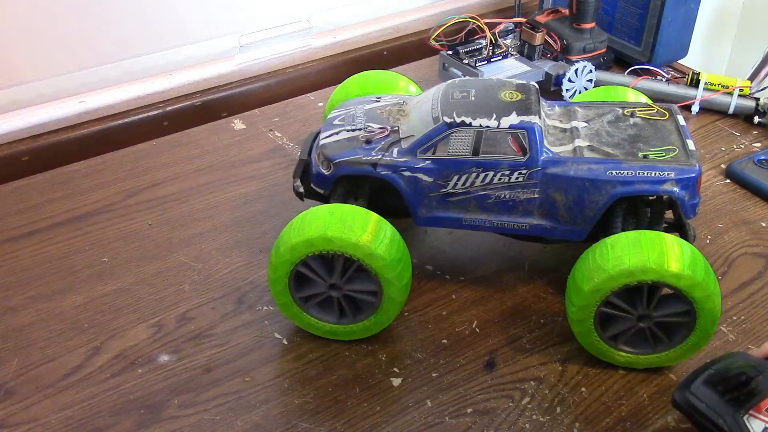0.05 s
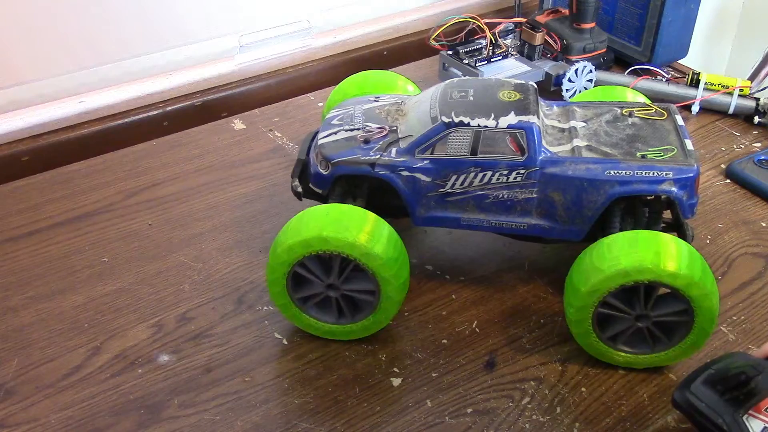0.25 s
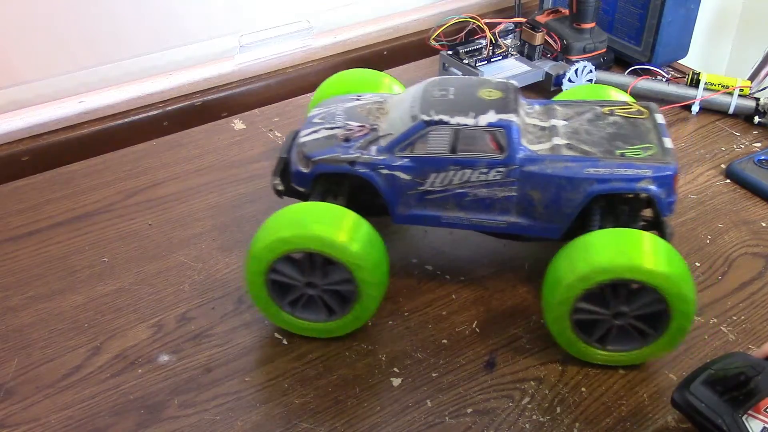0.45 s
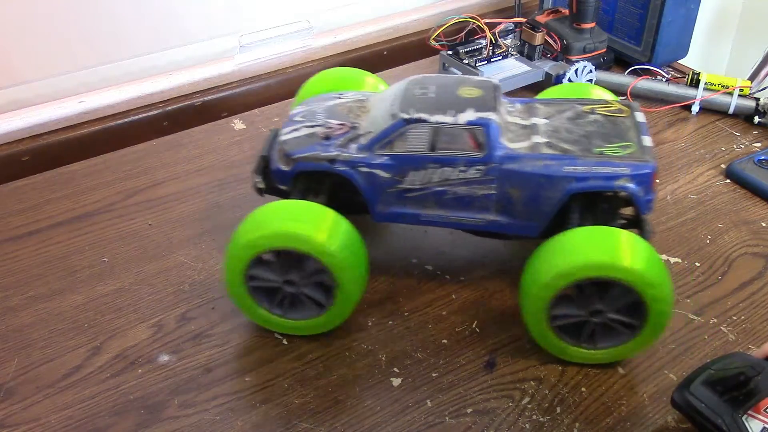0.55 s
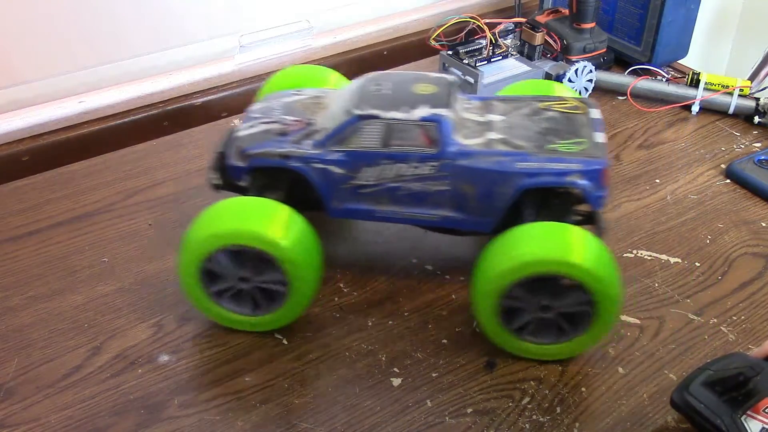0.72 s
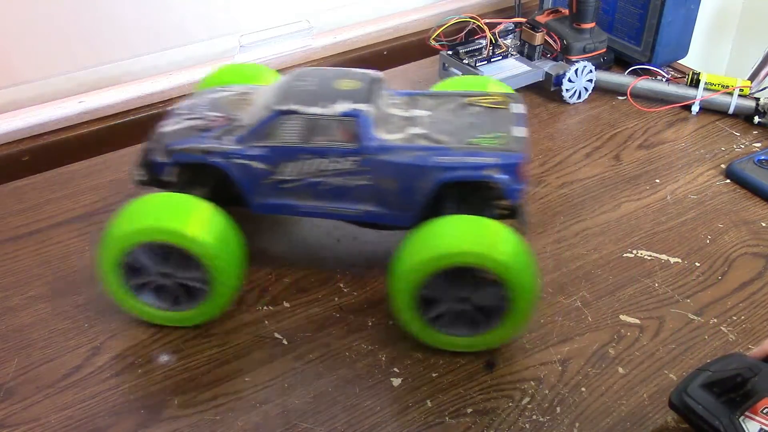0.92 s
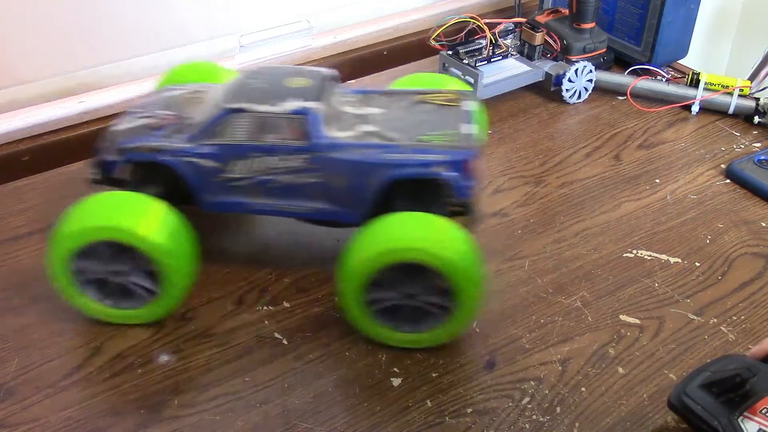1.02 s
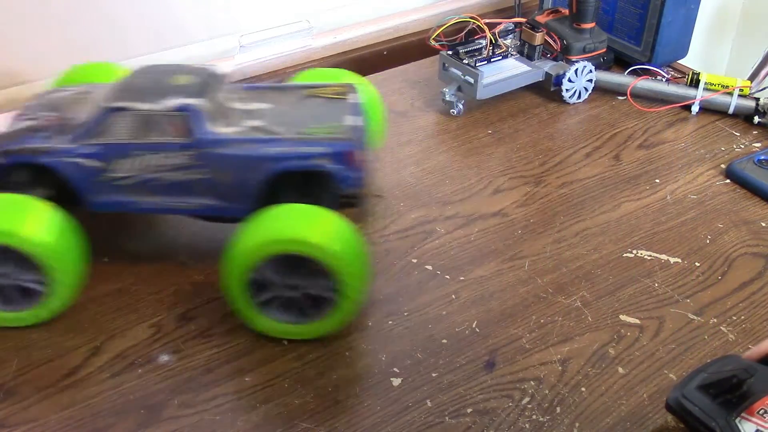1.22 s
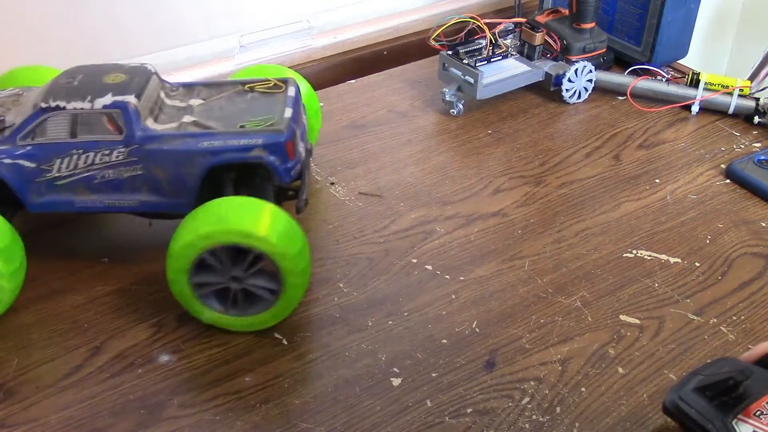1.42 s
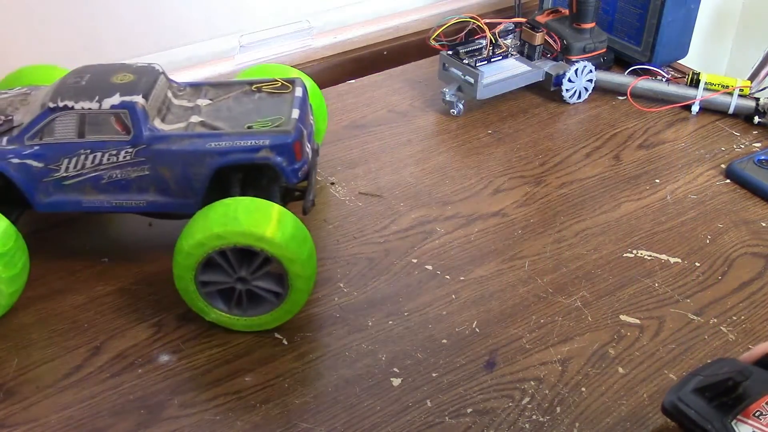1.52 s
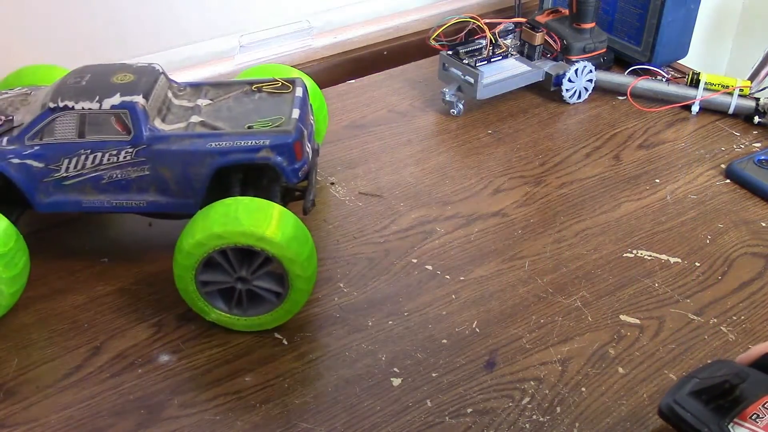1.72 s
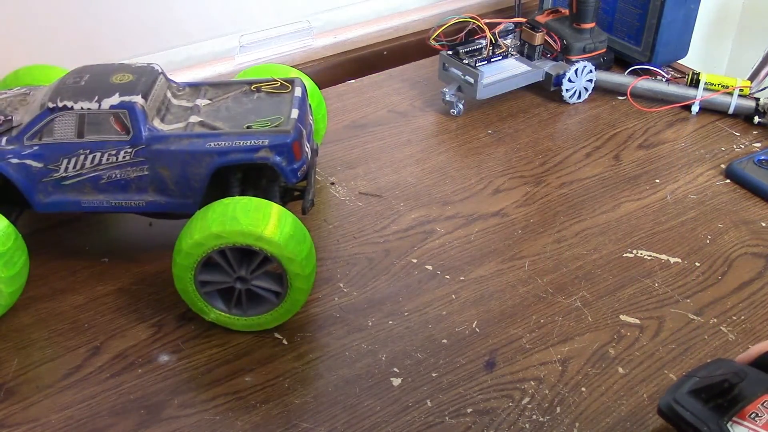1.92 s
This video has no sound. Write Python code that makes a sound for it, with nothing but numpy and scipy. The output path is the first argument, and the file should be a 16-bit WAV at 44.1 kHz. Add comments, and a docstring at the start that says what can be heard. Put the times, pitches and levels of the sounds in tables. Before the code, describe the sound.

A toy electric truck whines and rattles across a wooden table, then thumps to a stop.

```python
"""A toy electric truck on a wooden table in a small, quiet room, close to the microphone.
It creaks and pulls away at 0.2 s: plastic gears rattle and clack, and the chopped motor current
whines at a fixed pitch, fluttering as the rotor turns. The tyres set the table top booming.
Near 1.2 s the throttle is let go, the motor can pings and the gearbox clatters under braking.
From 1.5 s the body rocks to rest, with thumps that ring the table and a few last creaks."""
import sys
import numpy as np
from scipy import signal
from scipy.fft import rfft, irfft, next_fast_len
from scipy.io import wavfile
from scipy.ndimage import map_coordinates

SR = 44100
rng = np.random.default_rng(int(sys.argv[2]) if len(sys.argv) > 2 else 0)


def master_out(mix):
    """Clip the mix to full scale and print it as 16-bit PCM to the path in sys.argv[1]."""
    frames = np.transpose(np.atleast_2d(mix))
    ceiling = np.clip(frames, -1, 1)
    pcm = np.round(ceiling * 32767).astype(np.int16)
    wavfile.write(sys.argv[1], SR, pcm)


N = 85995
TIME = np.arange(N) / SR
ON_S, OFF_S, BRAKE_S = .2085, 1.172, 1.187
TICK_RISE_S, CLACK_RISE_S, CRACK_T60_S = .00042, .00086, .01

def amp(db):
    """Decibels to gain."""
    return 10 ** (np.asarray(db) / 20)

def unit(x):
    """x at rms 1."""
    return x / np.sqrt(np.mean(x ** 2) + 1e-20)

def noise():
    """White noise."""
    return rng.standard_normal(N)

def curves(rows):
    """One value per sample for each column after the time."""
    times, *columns = np.transpose(rows)
    return [np.interp(TIME, times, column) for column in columns]

def wobble(rate):
    """A smooth random curve, rate knots a second."""
    return map_coordinates(rng.standard_normal(1024), [TIME * rate], mode="wrap")

def coloured(x, points):
    """x through a minimum-phase filter of unit energy shaped by (f/Hz, level/dB) points."""
    size = 4096
    hz, db = np.transpose(points)
    gain = amp(np.interp(np.log(np.fft.rfftfreq(size, 1 / SR) + 1), np.log(hz), db))
    cepstrum = irfft(np.log(gain))
    cepstrum[1:size // 2] *= 2
    cepstrum[size // 2 + 1:] = 0
    response = irfft(np.exp(rfft(cepstrum)))
    return signal.fftconvolve(x, response / np.linalg.norm(response))[:N]

def grains(per_s, spread_db=3, scrape_db=.5):
    """Tiny impacts of uneven size over a scraping noise, rms 1."""
    sizes = amp(spread_db * rng.uniform(-1, 1, N)) * np.sign(noise())
    impacts = unit(sizes * (rng.random(N) < per_s / SR))
    return unit(impacts + amp(scrape_db) * noise())

def blow(start, db, rise, t60):
    """Envelope of one blow."""
    age = np.maximum(TIME - start, 0)
    return amp(db - 60 * age / t60) * (1 - np.exp(-age / rise))

def blows(rows, rise, t60):
    """Envelope of like blows, from rows that begin t/s, level/dB."""
    return np.sqrt(sum(blow(start, db, rise, t60) ** 2 for start, db, *_ in rows))

# spectrum of the still room: f/Hz, level/dB
HUSH_COLOUR = [(25, -42), (60, -8.5), (110, -3.5), (170, -4), (275, 5.5), (400, -3), (750, -6),
               (1200, -10.5), (2200, -14.5), (5000, -19), (9000, -25), (13000, -31.5), (15500, -36)]

def room_hush():
    """The low, steady hush behind the truck."""
    return amp(-59) * unit(coloured(noise(), HUSH_COLOUR))

# boom under the tyres: t/s, low mode level/dB, second mode level/dB
BOOM_LEVELS = [(0, -68, -96), (.2, -86, -64), (.3, -57, -71), (.37, -97, -72), (.8, -62, -83),
               (.88, -63, -47.5), (.97, -41, -48), (1.029, -69, -49.5), (1.11, -49, -39.5),
               (1.18, -55, -46.5), (1.245, -40, -36), (1.29, -79, -51.5), (1.355, -39, -42),
               (1.394, -35, -32.5), (1.429, -39.5, -56.5), (1.51, -49, -48), (1.6, -67, -60),
               (1.72, -51, -43.5), (1.8, -64.5, -75), (1.95, -98, -79)]
# those two modes: f/Hz, phase wander/rad, wander rate/Hz
BOOM_MODES = [(110.6, 0.91, 12.5), (199.2, 0.74, 28)]

def table_boom():
    """Rolling tyres drive two low modes of the wooden top."""
    out = np.zeros(N)
    for db, (hz, wander, rate) in zip(curves(BOOM_LEVELS), BOOM_MODES):
        gain = amp(db + 1.2 * wobble(rate))
        out += gain * np.sqrt(2) * np.sin(2 * np.pi * hz * TIME + wander * wobble(rate))
    return out

# sharp ticks: t/s, level/dB
TICKS = [(.166, -60), (.446, -36), (.488, -48), (.601, -47), (.761, -37.5), (.902, -41.5), (1.039, -44.5),
         (1.157, -34), (1.219, -50), (1.276, -31.5), (1.328, -33.5), (1.341, -34.5), (1.349, -39),
         (1.387, -37.5), (1.403, -40), (1.471, -47.5), (1.502, -53), (1.523, -63), (1.540, -53),
         (1.552, -55), (1.772, -51)]
# their spectrum, bright at close range: f/Hz, level/dB
TICK_COLOUR = [(300, -19), (1500, -3), (3000, 6.5), (5500, 3.5), (8300, 3), (10500, -6.5), (13000, -11.5),
               (15500, -23)]

def ticks():
    """Grit and loose parts strike in short, grainy bursts."""
    return coloured(blows(TICKS, TICK_RISE_S, t60=.034) * grains(per_s=3400), TICK_COLOUR)

# suspension creaks: t/s, level/dB
CREAKS = [(.166, -54), (1.737, -54.5), (1.752, -52.5), (1.771, -52.5)]
# their spectrum: f/Hz, level/dB
CREAK_COLOUR = [(500, -35), (1700, -6), (2600, 6), (3700, -5), (5000, -15), (15000, -40)]

def creaks():
    """The suspension creaks as the truck sets off and as it settles."""
    return coloured(blows(CREAKS, CLACK_RISE_S, t60=.084) * grains(per_s=1100), CREAK_COLOUR)

# gear rattle: t/s, level/dB
GEAR_LEVELS = [(.19, -78), (.22, -55), (.29, -54), (.37, -49.5), (.40, -46.5), (.55, -43.5), (.59, -45.5),
               (.63, -39.5), (.75, -43), (.85, -41), (.98, -41), (1.08, -39), (1.16, -35.5), (1.2, -40),
               (1.265, -41), (1.29, -31.5), (1.35, -33), (1.41, -34.5), (1.45, -44.5), (1.51, -52.5),
               (1.6, -60.5), (1.8, -66), (1.95, -66)]
# its spectrum while running: f/Hz, level/dB
GEAR_COLOUR = [(30, -48), (70, -9.5), (150, -1.5), (280, 5), (500, 3), (750, 5), (1050, 4), (1400, 2),
               (2100, -1), (3600, -4), (4400, -13.5), (7500, -19), (11000, -32), (15500, -44)]
# and under braking: f/Hz, level/dB
BRAKE_COLOUR = [(30, -42), (75, -11), (150, 1.5), (300, 2), (500, 6.5), (850, -4), (1200, -2.5), (2000, -8),
                (3700, -10), (4300, -14), (6800, -19), (9000, -25.5), (12000, -33.5), (15500, -47)]

def gears():
    """Plastic teeth rattle, harder under braking."""
    braking = np.clip((TIME - BRAKE_S) / .07, 0, 1)
    teeth = grains(per_s=700) * amp(curves(GEAR_LEVELS)[0] + 1.62 * wobble(90))
    return coloured(teeth * (1 - braking), GEAR_COLOUR) + coloured(teeth * braking, BRAKE_COLOUR)

# spectrum of the knocked plastic body: f/Hz, level/dB
PLASTIC_COLOUR = [(50, -45.5), (300, -16), (750, 5.5), (900, -2.5), (1250, 0.5), (2000, -4), (3500, -2.5),
                  (4500, -14.5), (8000, -27), (12000, -33.5), (15500, -53)]

def chatter(per_s=70, spread_db=4.5):
    """Loose parts tick at random, as strongly as the gears run."""
    hits = (rng.random(N) < per_s / SR) * amp(spread_db * rng.uniform(-1.2, 1, N))
    decay = amp(-60 * TIME[:SR // 20] / CRACK_T60_S)
    force = unit(signal.fftconvolve(hits, decay)[:N])
    return coloured(force * noise() * amp(curves(GEAR_LEVELS)[0] - 9.5), PLASTIC_COLOUR)

# passing rotor poles: t/s, f/Hz
POLE_RATE = [(0.21, 11.7), (0.5, 24.2), (0.66, 33.6), (0.77, 26.8), (1.06, 41.4), (1.18, 33.0)]
# strongest partials: t/s, then level/dB of the 1st, 2nd, 3rd and 5th
WHINE_LEVELS = [(.21, -49, -47, -49, -52), (.24, -50, -45, -56.5, -50), (.30, -42, -42, -57, -52),
                (.345, -34, -43.5, -54, -53), (.39, -45, -44, -50.5, -52),
                (.45, -35.5, -41.5, -49.5, -50.5), (.58, -43, -44, -53, -51.5),
                (.70, -40.5, -49, -58, -56.5), (.79, -35, -55.5, -63, -53), (.89, -32.5, -44, -48.5, -65),
                (.98, -34, -48, -47, -53), (1.07, -36, -47, -41, -54.5), (1.12, -35.5, -50, -44.5, -54),
                (1.17, -34.5, -47, -49, -56)]
# weaker partials: harmonic number, level/dB against the 5th
OVERTONES = [(6, -14), (7, -18), (8, -27.5), (9, -42), (11, -21.5), (12, -36), (13, -39)]
# flutter of the 1st, 2nd, 3rd and higher partials: depth (0-1), phase swing/rad, lag/rad, roughness/dB
FLUTTER = [(.48, .25, 0, .8), (.3, .5, 1.5, 1.5), (.25, .35, 3, 1.8), (.06, .08, 1, .9)]

def motor_whine(chop_hz=1116.8, attack_s=.004, release_s=.01):
    """Harmonics of the chopped current; each passing rotor pole swells and bends them."""
    pole_phase = 2 * np.pi * np.cumsum(curves(POLE_RATE)[0] * (TIME > ON_S)) / SR
    throttle = np.clip((TIME - ON_S) / attack_s, 0, 1) * np.exp(-np.maximum(TIME - OFF_S, 0) / release_s)
    first, second, third, fifth = curves(WHINE_LEVELS)
    # each clack loads the motor and swells its fundamental
    load = amp(-2) * blows(CLACKS, rise=.014, t60=.13)
    first = 20 * np.log10(np.hypot(amp(first), load))
    partials = [(1, first), (2, second), (3, third), (4, second - 17), (5, fifth)]
    partials += [(round(k), fifth + db) for k, db in OVERTONES]
    out = np.zeros(N)
    for k, db in partials:
        depth, swing, lag, rough_db = FLUTTER[min(k, len(FLUTTER)) - 1]
        phase = 2 * np.pi * (k * chop_hz * TIME + rng.random())
        bend = .17 * wobble(39.7) - swing * np.sin(pole_phase + lag)
        swell = 1 + depth * np.cos(pole_phase + lag)
        out += amp(db + rough_db * wobble(110)) * swell * np.sqrt(2) * np.sin(phase + bend)
    return throttle * out

def motor_can(ring_hz=12275):
    """The steel can buzzes with the gears while driven and pings as the throttle is let go."""
    driven = (TIME > ON_S) * (TIME < OFF_S)
    buzz = driven * amp(curves(GEAR_LEVELS)[0] - 30.5) * (wobble(160) + 1j * wobble(160))
    ping = blow(start=1.158, db=-40, rise=TICK_RISE_S, t60=.078) * np.exp(.5j * wobble(300))
    return np.real((buzz + ping) * np.exp(2j * np.pi * ring_hz * TIME))

# knocks on the body: t/s, level/dB, t60/s
CLACKS = [(0.221, -42, 0.14), (0.312, -37.5, 0.093), (0.385, -37, 0.18), (0.44, -34, 0.093),
          (.477, -34.5, 0.15), (0.519, -30, 0.051), (0.542, -35, 0.13), (.600, -28.5, 0.085),
          (0.661, -35.5, 0.097), (0.819, -38, 0.065), (1.078, -41.5, 0.029), (1.127, -32.5, 0.018),
          (1.146, -42, 0.046), (1.236, -36, 0.044), (1.274, -24.5, 0.061), (1.31, -36, 0.04),
          (1.326, -34, 0.056), (1.385, -36, 0.19)]
# narrow rasp near the whine's pitch: f/Hz, level/dB
RASP_COLOUR = [(300, -43.5), (850, -20), (960, -3.5), (1060, 3), (1200, -6.5), (1400, -31.5), (4000, -54.5)]

def clacks():
    """The gears' slack knocks the body and, while the current is on, shakes the whine into a rasp."""
    force = np.sqrt(sum(blow(start, db, CLACK_RISE_S, t60) ** 2 for start, db, t60 in CLACKS))
    first_contact = amp(-11) * blows(CLACKS, TICK_RISE_S, CRACK_T60_S)
    knocks = coloured(force * grains(per_s=1400) + first_contact * noise(), PLASTIC_COLOUR)
    rasp = amp(3) * coloured(force * (TIME < OFF_S) * noise(), RASP_COLOUR)
    return knocks + rasp

# thumps on the table: t/s, knock level/dB, ring level/dB
THUMPS = [(1.523, -33, -35), (1.539, -37.5, -33.5), (1.582, -39.5, -42), (1.614, -36.5, -38.5),
          (1.644, -34, -41.5), (1.664, -46, -37.5)]
# spectrum of the knock: f/Hz, level/dB
THUMP_COLOUR = [(60, -22), (200, -0.5), (450, 0), (750, -6), (1100, -12.5), (1600, -15), (2200, -25.5),
                (4000, -31), (8000, -59), (15000, -57)]
# ringing modes of the wood: f/Hz, level/dB, t60/s
TABLE_MODES = [(205.3, 2, 0.22), (265.3, -7.5, 0.24), (353, -13, 0.2), (430.2, -6.5, 0.25),
               (502, -9.5, 0.22), (752, -12.5, 0.11)]

def thumps(rise_s=.0012):
    """Wheels and body thump as the truck rocks to rest; the table rings each time."""
    out = coloured(blows(THUMPS, rise_s, t60=.12) * noise(), THUMP_COLOUR)
    for start, _, ring_db in THUMPS:
        for hz, mode_db, t60 in TABLE_MODES:
            envelope = blow(start, ring_db + mode_db + rng.normal(0, .92), rise_s, t60)
            out += envelope * np.sin(2 * np.pi * hz * (TIME - start))
    return out

def room(x, t60=.12):
    """The small room's diffuse answer, reaching the microphone 3 ms after the direct sound."""
    t = TIME[:SR // 2]
    tail = rng.standard_normal(len(t)) * amp(-60 * t / t60) * (t > .003)
    return signal.fftconvolve(x, tail / np.linalg.norm(tail))[:N]

def scene():
    """Close up and nearly mono: the room spreads the treble a little and the microphones hiss."""
    low_cut = signal.butter(2, 70, "high", fs=SR)  # the table top radiates little deep bass
    wood = signal.lfilter(*low_cut, table_boom() + thumps())
    direct = wood + ticks() + creaks() + gears() + chatter() + motor_whine() + motor_can() + clacks()
    mid = direct + amp(-19.5) * room(direct) + room_hush()
    spread = signal.lfilter(*signal.butter(1, 2500, "high", fs=SR), room(direct))
    hiss = unit(coloured(noise(), [(20, -20), (80, -17), (400, -2.5), (15000, -46.5)]))
    side = amp(-15.5) * spread + amp(-69) * hiss
    return np.array([mid + side, mid - side]) * amp([[.05], [-.05]])

def record(dry):
    """The recorder keeps nothing above its band limit."""
    top_hz = 15750
    size = next_fast_len(N + SR // 2)
    passband = np.fft.rfftfreq(size, 1 / SR) < top_hz
    return irfft(rfft(dry, size) * passband, size)[:, :N]

dry = scene()
out = record(dry)
master_out(out)
```